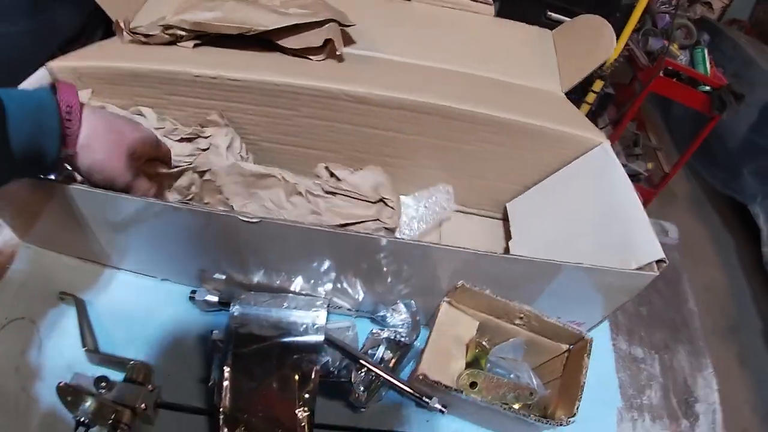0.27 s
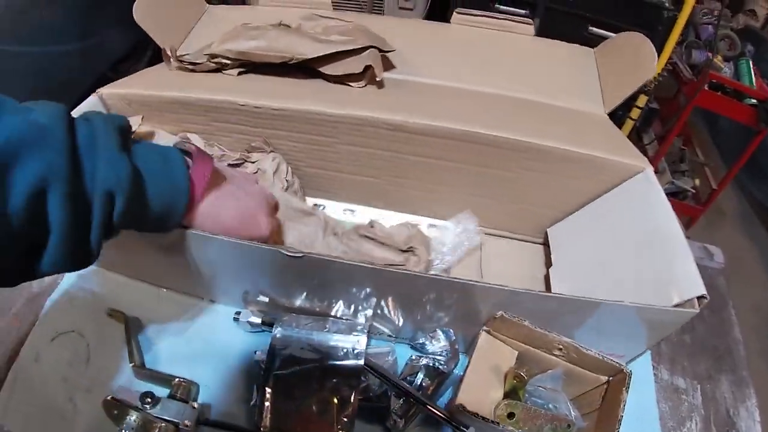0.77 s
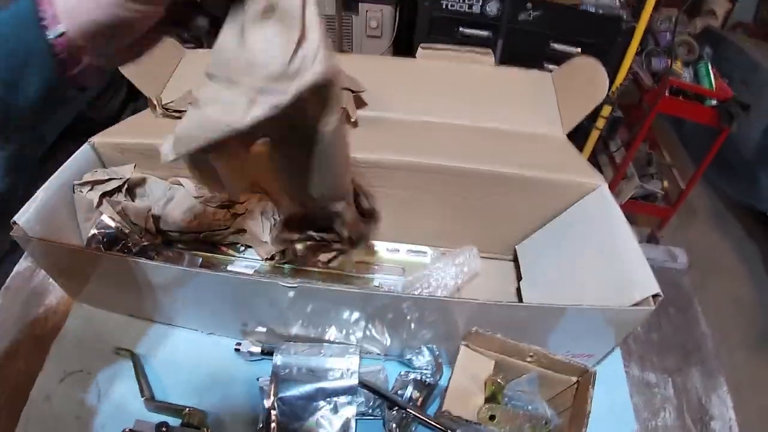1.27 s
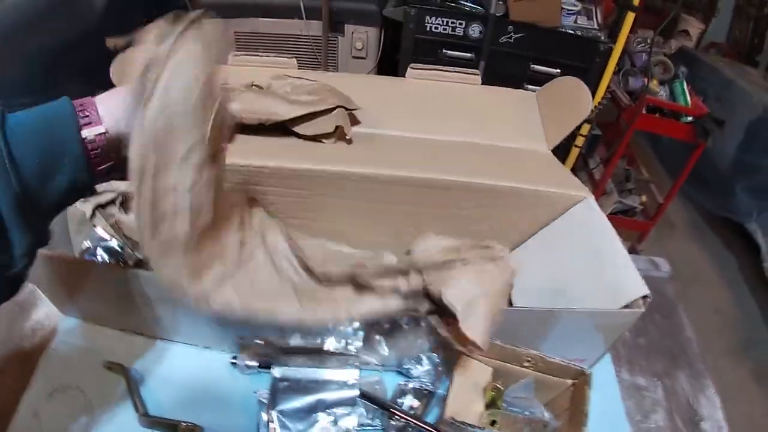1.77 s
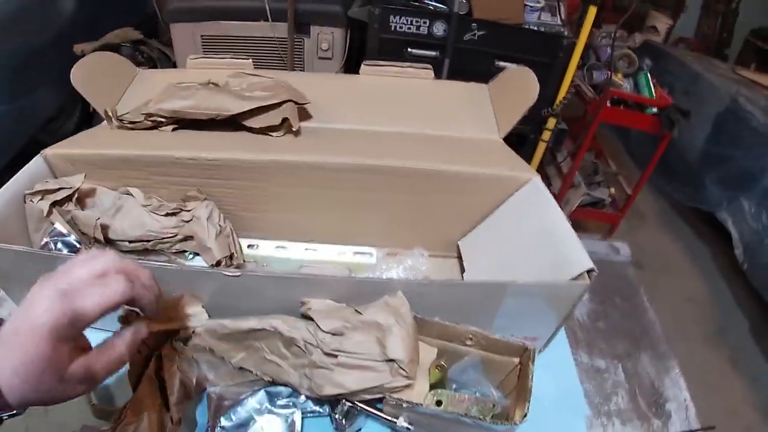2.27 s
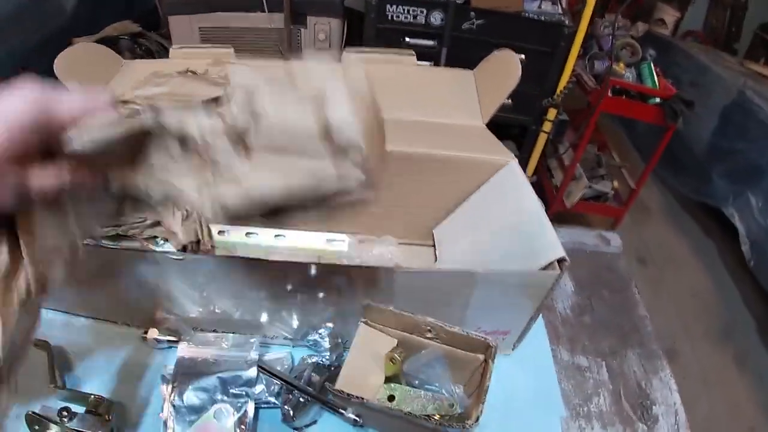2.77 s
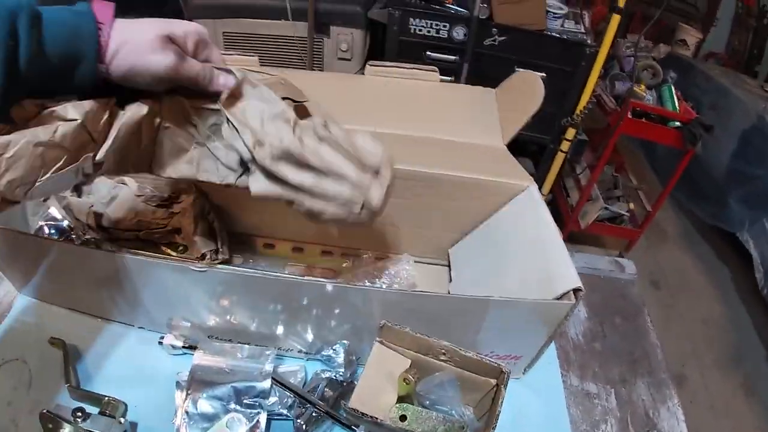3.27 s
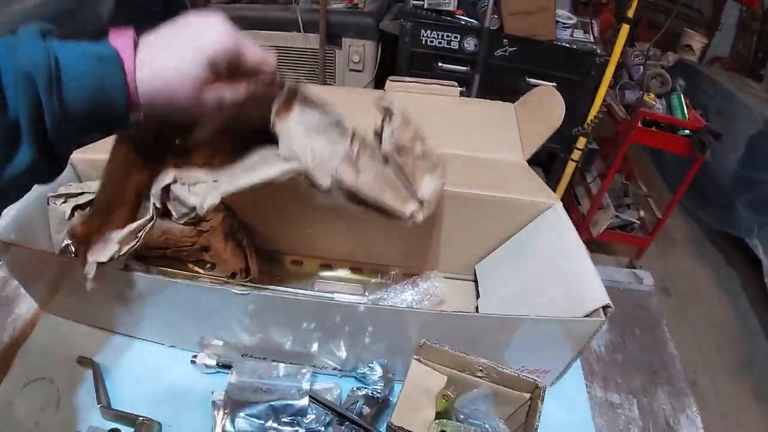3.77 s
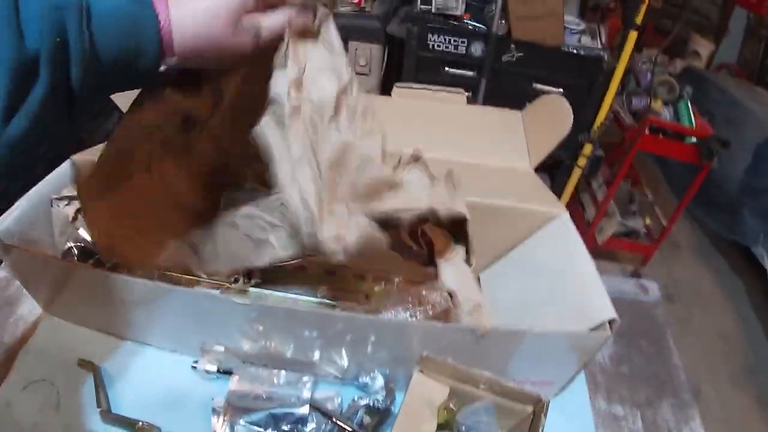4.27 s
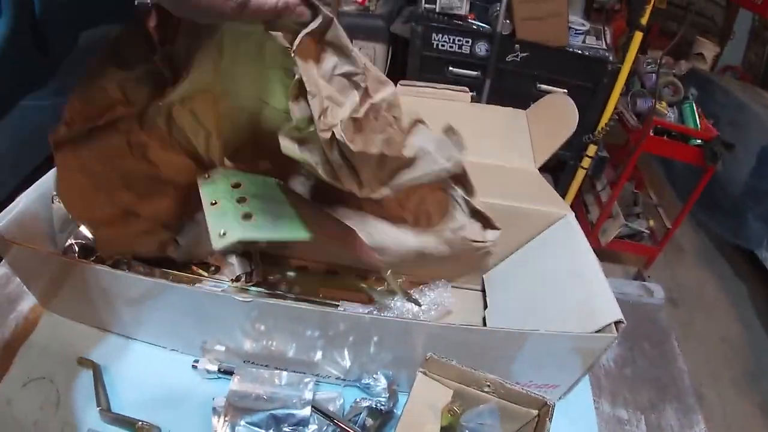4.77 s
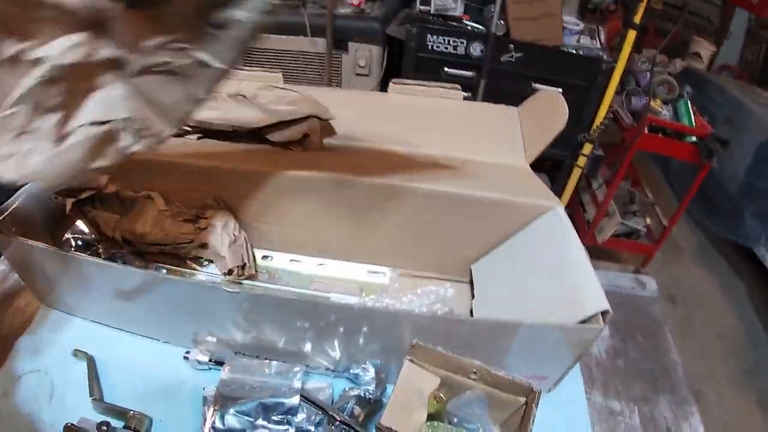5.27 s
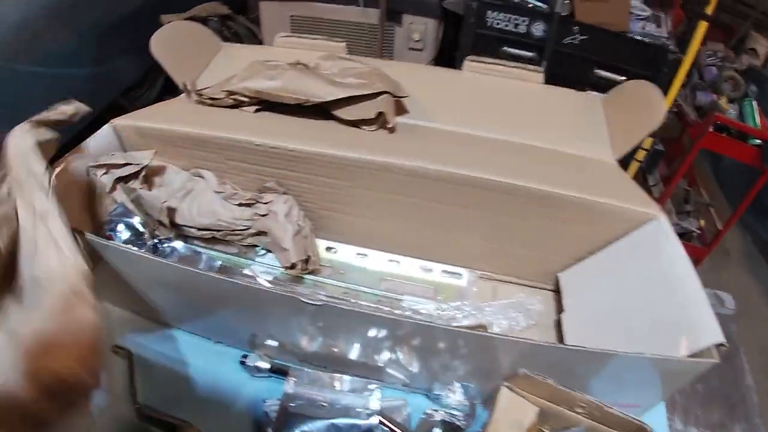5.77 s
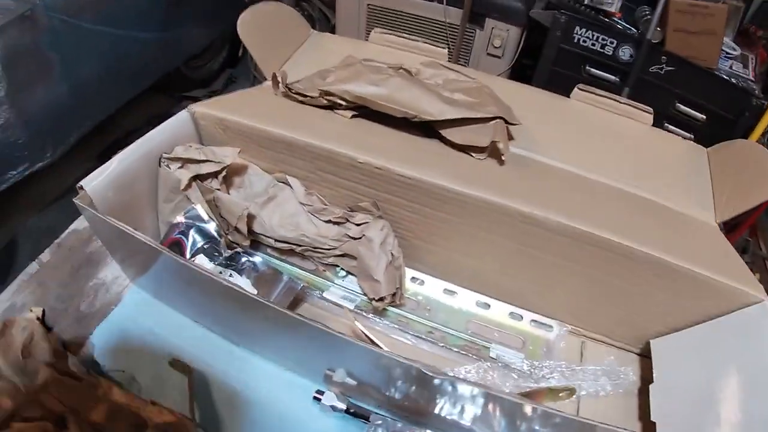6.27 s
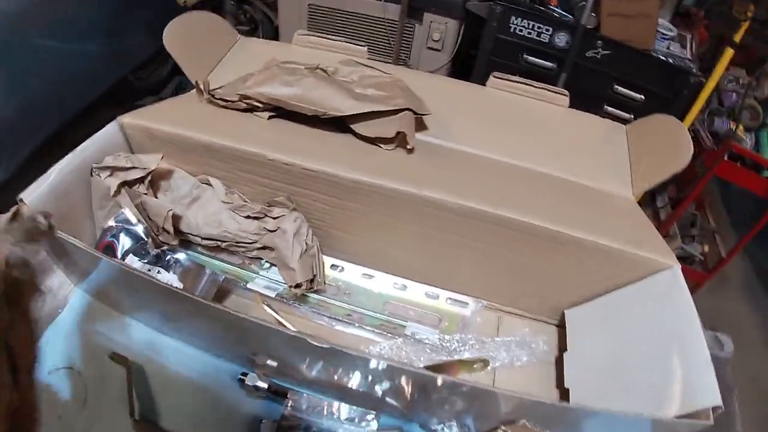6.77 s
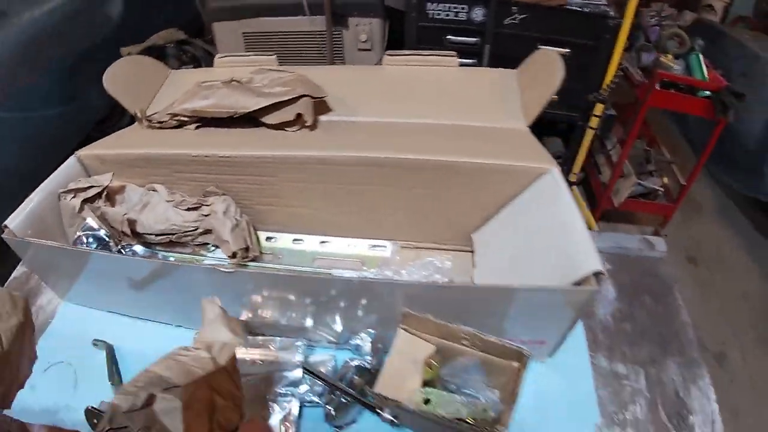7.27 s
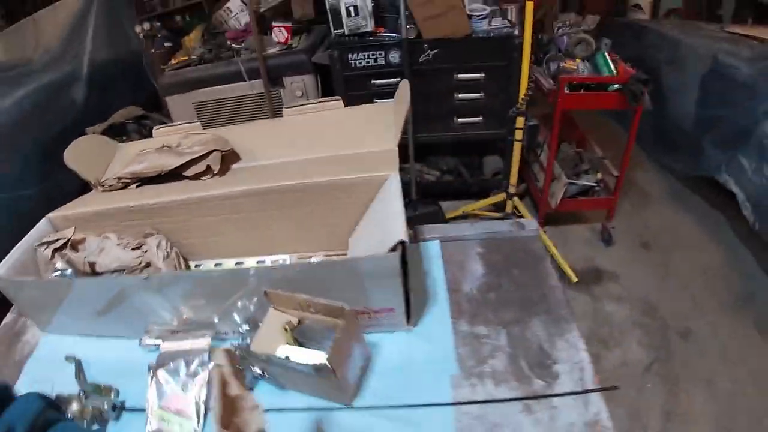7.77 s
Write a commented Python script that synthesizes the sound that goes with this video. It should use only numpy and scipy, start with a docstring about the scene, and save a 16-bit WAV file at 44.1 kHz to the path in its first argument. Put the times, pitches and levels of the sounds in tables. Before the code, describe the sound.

Close, crisp crackle of stiff packing paper being crumpled and shaken over a cardboard box, with dull bumps and a hollow knock in a low-rumbling garage.

```python
"""A small, cluttered garage under a low ventilation rumble, with a wad of packing paper close by.
A hand lifts, shakes out and puts aside the crumpled wad over a cardboard box: creases buckle in swarms
of tiny clicks with single sharp snaps, and a scrape sings at the end. Bumps ring the box's modes and
one knock with its rebound rings something hollow. The box walls and the garage answer the paper
with decaying noise; the two channels differ only in the treble."""
import sys
import numpy as np
from scipy import signal
from scipy.fft import rfft, irfft, next_fast_len
from scipy.io import wavfile
from scipy.ndimage import uniform_filter1d, map_coordinates

SR = 44100
rng = np.random.default_rng(int(sys.argv[2]) if len(sys.argv) > 2 else 0)


def to_wav(sig):
    """Store sig (one row per channel, or 1-D mono) as 16-bit WAV at the path in sys.argv[1].

    Samples outside -1..1 are clipped; the rate is SR.
    """
    pcm = np.clip(np.atleast_2d(sig), -1, 1) * 32767
    pcm = np.round(pcm).astype(np.int16)
    wavfile.write(sys.argv[1], SR, pcm.T)  # frames by channels


N = 353285  # samples, about 8 s


def amp(db):
    """Decibels to gain."""
    return 10 ** (np.asarray(db) / 20)


def unit(x):
    """Scale to rms 1."""
    return x / np.sqrt(np.mean(x ** 2) + 1e-20)


def along(points, hz):
    """Read (frequency, value) points on a log frequency axis."""
    f, v = np.transpose(points)
    return np.interp(np.log(hz + 1), np.log(f + 1), v)


def curves(rows):
    """One value per sample for each column after the time."""
    s, *cols = np.transpose(rows)
    return [np.interp(np.arange(N) / SR, s, c) for c in cols]


def wobble(rate):
    """A smooth random curve, rate knots a second."""
    knots = rng.standard_normal(int(N * rate / SR) + 4)
    return map_coordinates(knots, [np.arange(N) * rate / SR])


def coloured(x, points, size=4096):
    """Causal filter with the given (Hz, dB) response, so that attacks stay sharp."""
    log_gain = along(points, np.fft.rfftfreq(size, 1 / SR)) * np.log(10) / 20
    # folding the cepstrum onto positive times gives the minimum-phase response
    cepstrum = irfft(log_gain)
    cepstrum[1:size // 2] *= 2
    cepstrum[size // 2 + 1:] = 0
    response = irfft(np.exp(rfft(cepstrum)))
    return signal.fftconvolve(x, response)[:N]


def add(track, s, sound):
    """Mix a sound into the track at time s."""
    part = track[max(round(s * SR), 0):][:len(sound)]
    part += sound[:len(part)]


# rumble of the garage's ventilation: (time [s], rms level [dB])
RUMBLE_LEVEL = [(0, -35), (1.8, -35), (2.2, -38.5), (3.2, -33.5), (4.6, -33.5), (5.6, -38.5), (6.3, -35),
                (8.01, -36)]
# colour of the moving air: (frequency [Hz], relative density [dB per Hz])
AIR_COLOUR = [(25, -19), (35, -5), (75, 2.5), (105, -4), (135, 5.5), (200, -8), (240, -11.5), (310, -16),
              (550, -23.5), (1200, -36), (3000, -48), (6500, -47), (9000, -68), (15000, -75)]
# steady hum tones: (frequency [Hz], peak level [dB])
HUM_TONES = [(75, -40.5), (161, -47.5), (199, -48), (232, -49.5)]


def ventilation():
    """A low rush of air, coloured noise, with a few hum tones whose phase wavers."""
    rumble_db, = curves(RUMBLE_LEVEL)
    t = np.arange(N) / SR
    hum = sum(amp(db) * np.sin(2 * np.pi * hz * t + 0.76 * wobble(6)) for hz, db in HUM_TONES)
    air = unit(coloured(rng.standard_normal(N), AIR_COLOUR))
    return amp(rumble_db) * air + hum


# how long the garage rings: (frequency [Hz], time to fall 60 dB [s])
GARAGE_DECAY = [(150, 0.22), (800, 0.31), (4000, 0.15), (12000, 0.18)]


def reflections(x, near_db, near_t60, room_db, size=2048):
    """Box walls answer within milliseconds, the garage later, in fresh random echoes for each short piece."""
    pieces = np.pad(x, (0, -N % size)).reshape(-1, size)
    noise = rng.standard_normal((len(pieces), SR // 4))
    hz, t, z = signal.stft(noise, SR, nperseg=256)
    room_decay = amp(-60 * t / along(GARAGE_DECAY, hz)[:, None])
    room = signal.istft(z * room_decay, SR, nperseg=256)[1]
    near_decay = amp(-60 * np.arange(room.shape[1]) / SR / near_t60)
    near = rng.standard_normal(room.shape) * near_decay
    near_answer = amp(near_db) * near / np.linalg.norm(near[0])
    room_answer = amp(room_db) * room / np.linalg.norm(room[0])
    echoes = signal.fftconvolve(pieces, near_answer + room_answer, axes=1)
    track = np.zeros(N)
    for k, echo in enumerate(echoes):
        add(track, k * size / SR + 0.001465, echo)  # the echoes trail the direct sound
    return track


def blows(rows, modes, thud_db, thud_t60):
    """Each blow rings the body's modes over a noisy thud; a soft contact leaves out the high modes."""
    track, t = np.zeros(N), np.arange(SR // 2) / SR
    hz, mode_db, t60 = np.transpose(modes)[:, :, None]
    for s, db, cutoff_hz in rows:
        strength, detune = rng.standard_normal((2, len(modes), 1))
        gain = amp(mode_db + 2 * strength) / np.hypot(1, (hz / cutoff_hz) ** 2)
        tones = np.sin(2 * np.pi * hz * (1 + 0.024 * detune) * t)
        ring = np.sum(gain * tones * amp(-60 * t / t60), axis=0)
        ring = ring * (1 - np.exp(-t * cutoff_hz / 2))  # the softer the contact, the slower the push
        band_hz = [hz.min(), np.clip(cutoff_hz, 2 * hz.min(), SR / 4)]
        b, a = signal.butter(2, band_hz, "band", fs=SR)
        thud = unit(signal.lfilter(b, a, rng.standard_normal(len(t))))
        thud = thud * amp(thud_db - 60 * t / thud_t60)
        add(track, s, amp(db) * (ring / np.abs(ring).max() + thud))
    return track


# the hollow knock and its rebound: (time [s], peak level of the ring [dB], contact cut-off [Hz])
KNOCK_TIMES = [(5.051, -2, 640), (5.068, -18, 3856)]
# modes of the hollow body, before random spread: (frequency [Hz], level [dB], time to fall 60 dB [s])
HOLLOW_MODES = [(155, -9, 0.62), (191, -10, 0.6), (210, 3, 0.095), (239, -11, 0.26), (313, -15.5, 0.3),
                (390, -17, 0.349), (448, 1, 0.047), (511, -11, 0.12), (692, -13, 0.23), (1166, -9.5, 0.11),
                (1630, -7, 0.11), (1950, -7, 0.088)]


def hollow_knock():
    """Something hollow is struck and rebounds once; its modes ring over a faint thud."""
    return blows(KNOCK_TIMES, HOLLOW_MODES, thud_db=-21, thud_t60=0.3)


# paper and hand bumping the box: (time [s], peak level of the ring [dB], contact cut-off [Hz])
BUMP_TIMES = [(0.256, -15.5, 300), (0.271, -17.5, 256), (0.303, -16, 160.2), (0.336, -12.5, 109),
              (0.372, -26, 100), (1.716, -24.5, 178.5), (1.895, -6, 361.4), (1.906, -15, 340.2),
              (2.176, -30, 400), (4.285, -24, 200), (4.345, -20.5, 259.8), (4.402, -22, 169.7),
              (4.468, -18.5, 220.3), (4.503, -19, 199.9), (4.585, -22, 300.1), (4.691, -14, 129.9),
              (4.998, -18.5, 151), (5.955, -23, 150.2), (6.716, -13, 340.7), (6.742, -22, 299.9),
              (6.778, -27, 240), (6.83, -27, 249.7)]
# modes of the cardboard box, before random spread: (frequency [Hz], level [dB], time to fall 60 dB [s])
BOX_MODES = [(40.4, -12, 0.14), (70.2, -1.5, 0.076), (100, 3, 0.09), (140.4, -0.5, 0.1), (187, 2.5, 0.068),
             (246, -4, 0.12), (312, -1, 0.099), (413, -8.5, 0.12), (537, -8, 0.068), (774, 3, 0.071)]


def box_bumps():
    """Paper and hand bump the cardboard, whose low modes die quickly under a noisy thud."""
    return blows(BUMP_TIMES, BOX_MODES, thud_db=-8.5, thud_t60=0.13)


# a scrape that sings as it slides: (time [s], centre pitch [Hz], level before random wavering [dB])
SQUEAK_PATH = [(7.85, 4230, -55.5), (7.88, 4010, -36), (7.92, 4050, -36), (8.01, 4020, -35.5)]


def squeak():
    """Stick and slip give a rough, wavering tone and its octave."""
    hz, db = curves(SQUEAK_PATH)
    phase = 2 * np.pi * np.cumsum(hz * (1 + .035 * wobble(1500))) / SR
    sliding = np.arange(N) / SR > SQUEAK_PATH[0][0]
    level = amp(db + 2.34 * wobble(170))
    return sliding * level * (np.sin(phase) + amp(-9.5) * np.sin(2 * phase))


def snap_waves(hz, life, jitter, size=512):
    """One row per buckle: a quick swell and decay whose phase wanders as the crumpled sheet bends."""
    t = np.arange(size) / SR
    steps = rng.standard_normal((len(hz), size))
    drift = np.cumsum(steps, axis=1) * jitter * np.sqrt(hz[:, None] / SR)
    u = t / life[:, None]
    envelope = np.sqrt(2 * np.e * u) * np.exp(-u)
    return np.sin(2 * np.pi * hz[:, None] * t + drift) * envelope


# single creases snapping through: (time [s], relative level before levelling off [dB], pitch [Hz])
SNAP_TIMES = [(0.016, -12, 5120), (0.038, -14.5, 4860), (0.068, -8.5, 2180), (0.082, -5, 5610),
              (0.106, -11, 3710), (0.182, -13.5, 5780), (0.336, -10, 4700), (0.357, -13, 4210),
              (0.426, -20.5, 4020), (0.472, -19, 3860), (0.722, -18, 3870), (0.767, -12.5, 5880),
              (0.779, -8, 3890), (0.807, -20, 3300), (0.906, -2, 2667), (0.938, -9, 3540),
              (1.043, -6, 4700), (1.078, -12, 1080), (1.13, -2, 899), (1.145, -12.5, 4054),
              (1.188, -10, 3218), (1.338, -3, 1334), (1.536, -10, 5140), (1.552, -11, 2330),
              (1.59, -12, 3870), (1.601, -18, 2590), (1.704, -3, 5362), (1.719, -10, 3820), (1.889, 5, 787),
              (1.997, -15, 5863), (2.07, -16.5, 3134), (2.123, -13.5, 1403), (2.176, -13, 4795),
              (2.422, -25, 3526), (2.526, -12, 4855), (2.555, -11.5, 5036), (2.644, -9, 4754),
              (2.741, -11, 3774), (2.998, -9.5, 3580), (3.083, -6, 2918), (3.154, -13.5, 3400),
              (3.221, -9, 2480), (3.275, -12, 2785), (3.451, -7.5, 5043), (3.531, -12, 1940),
              (3.54, -19, 2100), (3.568, -3, 1660), (3.702, 5, 3187), (3.769, -7, 3445), (3.829, -8, 2946),
              (3.894, -6, 4130), (3.95, -25, 1610), (4.052, -11, 4530), (4.129, -7, 1424),
              (4.251, -8, 3423), (4.689, 0, 4693), (5.0, -14.5, 2668), (5.047, -3.5, 1990),
              (5.791, -16, 4110), (5.96, -10, 1103), (6.038, -13, 2944), (6.31, -14, 1196),
              (6.523, -10, 3638), (6.623, -15, 3050), (6.653, -13.5, 1462), (6.714, 1, 4056),
              (6.797, -26, 1830), (6.829, -16, 675), (6.852, -15, 1270), (6.96, -3, 914),
              (7.027, -13.5, 725), (7.085, -16, 953), (7.235, -11.5, 1210), (7.289, -5, 3130),
              (7.295, -9, 3700), (7.401, -9.5, 824), (7.486, -3, 3860), (7.535, -10, 4340),
              (7.692, -9, 915)]
# colour common to all snaps: (frequency [Hz], gain [dB])
SNAP_TONE = [(200, -20), (600, -13.5), (1300, -2.5), (6200, 0), (7800, -11), (10000, -21), (11300, -28.5),
             (13000, -25), (14500, -37), (15500, -35)]


def snaps(cycles, ring_db, crack_db, crack_t60, max_db, follow_db):
    """A crease flips with a broad crack and a few cycles of ring, and tips over two neighbours."""
    track, t = np.zeros(N), np.arange(SR // 20) / SR
    times, level_db, hz = np.transpose(SNAP_TIMES)
    rings = amp(ring_db) * snap_waves(hz, 0.00041 + cycles / hz, jitter=0.97)
    crack = amp(crack_db - 60 * t / crack_t60)
    # a crease can store only so much energy, so the strongest snaps level off
    gains = amp(level_db) / np.hypot(1, amp(level_db - max_db))
    for s, gain, ring in zip(times, gains, rings):
        add(track, s, gain * ring)
        add(track, s, gain * crack * np.tanh(rng.standard_normal(len(t))))
        delay, detune = rng.standard_normal((2, 2))
        neighbours = snap_waves(3400 * np.exp(0.385 * detune), np.full(2, .0005), jitter=0.85)
        lags = .004 * np.exp(.5 * delay)  # seconds
        for lag, click in zip(lags, neighbours):
            add(track, s + lag, gain * amp(follow_db) * click)
    return coloured(track, SNAP_TONE)


def buckles(level_db, colour, pitch_hz, rate, spread_db, life, rub_db, size=512):
    """A swarm of buckling clicks over the rub of sliding paper; harder work makes it denser."""
    density = rate * amp(.4 * (level_db - level_db.max()))  # clicks a second
    start = np.flatnonzero(rng.random(N) < density / SR)
    pitch, strength, length, sign = rng.standard_normal((len(start), 4)).T
    height = np.sign(sign) * amp(spread_db * np.minimum(strength, 1.8))
    waves = snap_waves(pitch_hz * np.exp(.35 * pitch), life * np.exp(0.57 * length), jitter=1.33)
    grains = height[:, None] * waves
    places = start[:, None] + np.arange(size)
    clicks = np.bincount(places.ravel(), grains.ravel(), N)[:N]
    clicks = coloured(clicks, colour)
    # the clicks of each moment share the energy that the hand puts in
    power = np.abs(uniform_filter1d(uniform_filter1d(clicks ** 2, size=1500), size=1100))
    clicks = clicks / np.sqrt(power + 0.11 * power.mean())
    rub = unit(coloured(rng.standard_normal(N), colour))
    return amp(level_db) * unit(clicks + amp(rub_db) * rub)


# each grip, pull or shake crushes part of the wad: (time [s], length [s], relative level [dB],
# swell from start to end [dB], extra broad folds [dB])
CRUNCH_TIMES = [(0.0, 0.035, -38, -8, 2), (0.183, 0.055, -30.0, -2.0, -5.5),
                (0.234, 0.064, -26.0, -1.0, 4.5), (0.328, 0.044, -36.0, 1.0, -3),
                (0.5, 0.13, -39.0, -6.0, 3.0), (0.743, 0.22, -35.0, 8.0, -2.5),
                (0.979, 0.16, -29.5, 6.0, 3.5), (1.173, 0.079, -32.0, 4.0, 1.0),
                (1.278, 0.044, -26.5, 2.0, 3.0), (1.388, 0.051, -28, 2, 0.5), (1.455, 0.045, -26, 5, 2),
                (1.525, 0.027, -32.5, 3.0, 3.0), (1.599, 0.069, -32.0, -1.0, -6.0),
                (1.684, 0.151, -30.0, 3.0, -2.0), (1.839, 0.092, -31.5, -2, 0.5),
                (2.122, 0.032, -32.5, 0, 1.5), (2.169, 0.074, -32.5, -9, 4), (2.43, 0.075, -49, 2.5, -14),
                (2.513, 0.24, -32.0, -5.0, -4), (2.781, 0.07, -38.0, -2, 5.0), (2.91, 0.17, -31.0, 2.0, -8),
                (3.144, 0.05, -42.5, 4.0, 0.0), (3.223, 0.053, -38.5, 3.0, 4),
                (3.411, 0.041, -34.0, -2.0, -1.5), (3.517, 0.076, -32.5, -8.0, 1.0),
                (3.595, 0.1, -28.5, 13.0, -3.5), (3.748, 0.072, -37.0, 3.0, -4),
                (3.824, 0.066, -26.5, 8.0, -2.0), (3.949, 0.111, -23.5, -1.0, 0.0),
                (4.077, 0.045, -23.0, -2.0, 4.5), (4.224, 0.099, -23.5, 1.0, 4.5),
                (4.374, 0.1, -26.0, 8.0, 7.0), (4.493, 0.031, -24.0, -11.0, 5.5),
                (4.562, 0.065, -29.5, 3.5, 6.0), (4.675, 0.083, -24.5, 0.0, 4.0),
                (4.792, 0.071, -37.5, 8.0, -5), (5.029, 0.019, -29.5, 3.0, 1.5),
                (5.134, 0.055, -42.5, -1.0, 0.0), (5.414, 0.037, -58.5, -11, 1),
                (5.601, 0.049, -66.5, -6, -0.5), (5.728, 0.12, -38.5, 4, 4),
                (5.954, 0.093, -32.5, 0.0, 1.0), (6.12, 0.16, -34.0, -1.0, -1.0),
                (6.322, 0.15, -37.5, -3.0, 1.0), (6.477, 0.081, -36.0, 6.0, -4.0),
                (6.715, 0.16, -27, -4, 1), (6.91, 0.029, -27.5, -3.0, 2.5), (7.05, 0.148, -30.5, 6, 0),
                (7.307, 0.031, -26, 2, -1), (7.433, 0.06, -28.5, -1.5, 2.5),
                (7.524, 0.16, -30.5, 1.5, -1.0), (7.686, 0.08, -27.5, -6.0, 3.0),
                (7.905, 0.084, -29.5, -3.0, -4.0)]
# how fast the wad slides between the crunches: (time [s], relative level [dB])
SLIDE_LEVEL = [(0.0, -34.0), (0.69, -46.0), (0.8, -33.0), (1.8, -41.0), (2.3, -36.0), (2.4, -55.0),
               (2.55, -35.0), (3.12, -47.0), (3.38, -42.0), (3.7, -32.0), (4.7, -29.0), (5.1, -45.0),
               (5.27, -70.0), (5.7, -64.0), (5.76, -40.0), (6.7, -39.0), (7.0, -34.0), (8.01, -35.0)]
# the part of the wad that gives way, against small creases: (time [s], facets [dB], broad folds [dB])
SIZE_BALANCE = [(0.0, -5.0, -7.0), (0.6, -4.0, -12.0), (1.5, 3.0, -10.0), (2.6, -4.0, -6.0),
                (3.1, 3.0, -10.0), (4.0, -1.0, -14.0), (4.9, -1.0, -10.0), (6.3, 3.0, -0.0),
                (7.6, 2.0, -2.0), (8.01, -4.5, -3.0)]
CRUNCH_ATTACK_S, CRUNCH_T60_S = .006, .11  # quick onset; settles when the hand lets up


def handling():
    """Crease, facet and fold levels [dB]: crunches build or ease as the hand presses, over the sliding."""
    t = np.arange(N) / SR
    slide_db, = curves(SLIDE_LEVEL)
    facet_db, fold_db = curves(SIZE_BALANCE)
    power = fold_power = amp(slide_db) ** 2
    for s, length, db, swell_db, broad_db in CRUNCH_TIMES:
        attack = np.clip((t - s) / CRUNCH_ATTACK_S, 0, 1)
        press_db = swell_db * (np.clip((t - s) / length, 0, 1) - .5)
        release_db = -60 * np.clip((t - s - length) / CRUNCH_T60_S, 0, 2)
        crunch = (attack * amp(db + press_db + release_db)) ** 2
        power = power + crunch
        fold_power = fold_power + crunch * amp(broad_db) ** 2
    work_db = 10 * np.log10(power)
    return work_db, work_db + facet_db, 10 * np.log10(fold_power) + fold_db


# colour of the small creases: (frequency [Hz], relative density [dB per Hz])
CREASE_COLOUR = [(1200, -28), (2200, -4), (3000, -2.5), (5200, -1), (6400, -4), (7500, -14), (9700, -21),
                 (11300, -32.5), (13000, -24.5), (14500, -40), (15500, -55)]
# colour of the stiff facets: (frequency [Hz], relative density [dB per Hz])
FACET_COLOUR = [(500, -26.5), (900, -15.5), (1250, -0.5), (1700, -1.5), (2400, -1.5), (3500, -0.5),
                (7000, -43.5)]
# colour of the broad folds: (frequency [Hz], relative density [dB per Hz])
FOLD_COLOUR = [(120, -4.5), (260, -0.5), (400, -9), (550, -3.5), (780, 4.5), (1050, 4.5), (1400, -9.5),
               (3000, -56.5)]


def rustle():
    """Small creases tick, stiff facets crackle and broad folds flap."""
    crease_db, facet_db, fold_db = handling()
    # pitch in Hz, rate in clicks a second at the hardest work, life in s
    creases = buckles(crease_db, CREASE_COLOUR, pitch_hz=4560, rate=1500, spread_db=5.5,
                      life=0.00033, rub_db=-5)
    facets = buckles(facet_db, FACET_COLOUR, pitch_hz=1700, rate=900, spread_db=4.5,
                     life=0.00056, rub_db=-3)
    folds = buckles(fold_db, FOLD_COLOUR, pitch_hz=758, rate=450, spread_db=5,
                    life=0.0012, rub_db=-1.0)
    # one buckle sets off its neighbours, so all sizes come in small avalanches
    avalanche = amp(1.03 * wobble(70) + 2.14 * wobble(260))
    return avalanche * (amp(-0.5) * creases + amp(-1.6) * facets + amp(-1.7) * folds)


# how far the wad is turned away or hidden, dulling its top: (time [s], treble gain [dB])
TURNING = [(0, -1.5), (1.8, 1.5), (2.35, -9), (2.6, 1.5), (3.2, -2.5), (3.7, 1.5), (4.7, 1.5), (5.1, -5),
           (5.8, 4), (7.05, -2), (7.8, -7), (7.97, 0)]


def shaded(x):
    """The treble above about 7 kHz comes and goes as the wad turns."""
    treble_db, = curves(TURNING)
    highpass = signal.butter(4, 7200, "high", fs=SR, output="sos")
    top = signal.sosfiltfilt(highpass, x)
    return x + (amp(treble_db) - 1) * top


def scene():
    """The garage's air behind, box and hollow body, and the paper close by, alike in both channels."""
    background = ventilation()
    knocks = box_bumps() + hollow_knock()
    creases = snaps(cycles=0.97, ring_db=-5.0, crack_db=-2.0, crack_t60=0.013, max_db=-6.0, follow_db=-9.5)
    paper = shaded(amp(-0.7) * rustle() + amp(3.5) * creases + squeak())
    echoes = reflections(paper, near_db=-11.0, near_t60=0.021, room_db=-14)
    mono = background + knocks + paper + echoes
    return np.array([mono, mono])


# treble response of the left channel: (frequency [Hz], gain [dB])
LEFT_TREBLE = [(10500, 0), (12500, -5)]
# treble response of the right channel: (frequency [Hz], gain [dB])
RIGHT_TREBLE = [(10500, 0), (12500, 2.5)]
BAND_LIMIT_HZ = 15700


def record(dry):
    """The channels differ only in the treble, which flickers on its own in each, up to the band limit."""
    m = next_fast_len(N + SR // 4)
    hz, spectrum = np.fft.rfftfreq(m, 1 / SR), rfft(dry, m)
    top = irfft(spectrum * (hz > 11000), m)[:, :N]
    flicker = .5 * top * np.array([wobble(400), wobble(400)])
    treble = amp([along(LEFT_TREBLE, hz), along(RIGHT_TREBLE, hz)])
    heard = (spectrum + rfft(flicker, m)) * treble * (hz < BAND_LIMIT_HZ)
    return irfft(heard, m)[:, :N]


dry = scene()
out = record(dry)
to_wav(out)
```